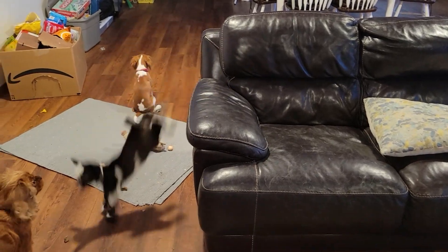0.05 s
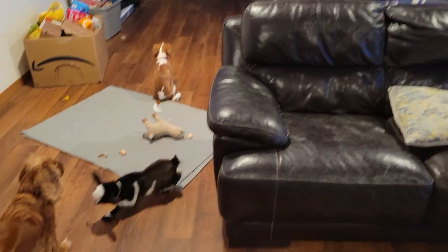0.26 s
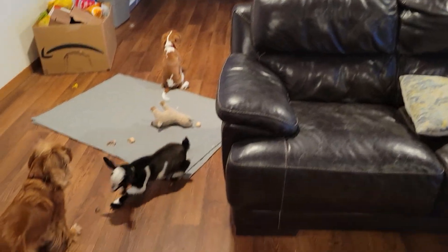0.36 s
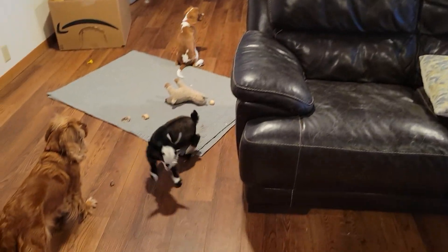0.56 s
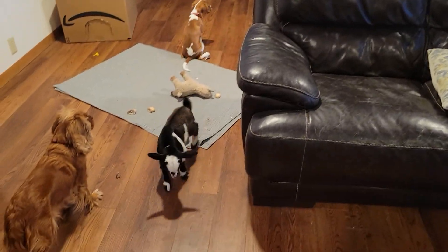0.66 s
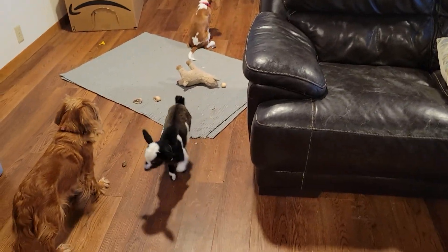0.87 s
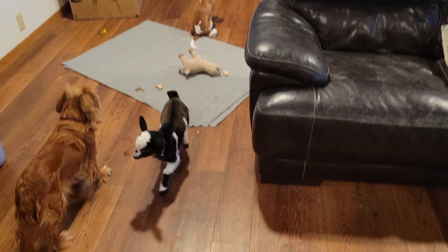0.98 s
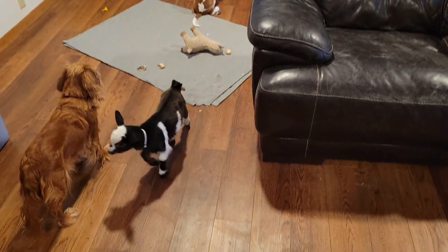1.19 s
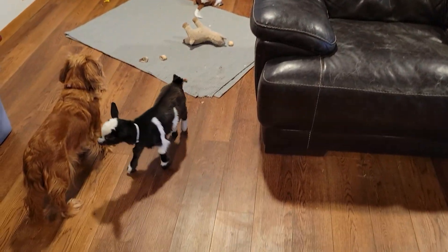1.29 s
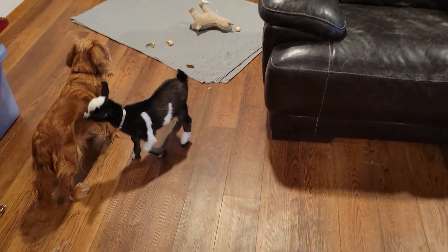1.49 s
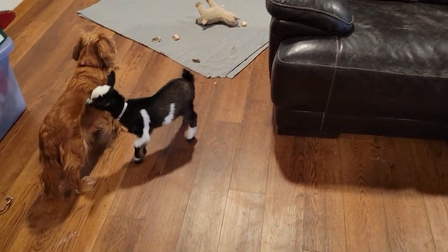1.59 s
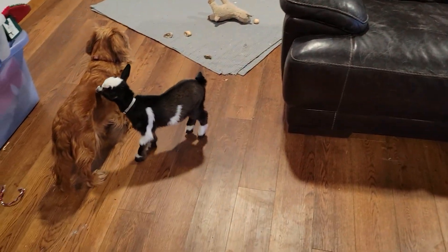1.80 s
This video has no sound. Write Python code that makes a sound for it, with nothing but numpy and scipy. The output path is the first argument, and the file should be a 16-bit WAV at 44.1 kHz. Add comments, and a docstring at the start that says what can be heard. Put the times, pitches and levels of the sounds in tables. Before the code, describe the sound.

A small goat's hooves land sharply on a wooden floor, followed by faint taps.

```python
"""In an echoing living room, a kid goat jumps off a couch onto a wooden floor.
Front hooves land, then hind hooves, with a skid and a clatter; it walks on with faint taps and scuffs.
Each hoof clicks, knocks the wood, rings the boards and thuds the floor; sliding hooves scrape.
The room answers over a low rumble, a weak hum and a faint hiss, all heard by a phone held above."""
import sys
import numpy as np
from scipy import signal
from scipy.fft import rfft, irfft
from scipy.io import wavfile

SR = 44100
rng = np.random.default_rng(int(sys.argv[2]) if len(sys.argv) > 2 else 0)


def transcribe(u):
    """Save the signal u as a 16-bit wav file named by the first command-line argument.

    u: samples, shape (n,) or (channels, n), limited to [-1, 1]; the rate is SR.
    q: integer samples, one column per channel.
    """
    v = np.clip(np.atleast_2d(u).T, -1, 1)
    q = np.round(v * 32767).astype(np.int16)
    wavfile.write(sys.argv[1], SR, q)


N = 81585

# Hooves striking: the first row is the goat pushing off the couch, the rest hit the floor. Each row: start in
# seconds, knock level in dB, knock pitch in Hz, knock fade time in seconds, click level in dB, bright tick
# level in dB, thud level in dB, left minus right in dB. A fade time (t60) is how long a sound takes to drop by
# 60 dB.
HOOF_STRIKES = [ (0.032, -64, 735, 0.054, -77, -59, -42.5, 0.5),
                (0.2006, -9.5, 880, 0.0031, -13.5, -35, -46, -1.5),
                (0.2077, -11.5, 1344, 0.0074, -41, -29.5, -44, -0.5),
                (0.2138, -29, 980, 0.005, -32, -34, -42, -12),
                (0.243, -32, 1370, 0.023, -30, -55, -39.5, -1),
                (0.2827, -27, 1160, 0.0027, -30, -31, -47, -16.5),
                (0.2847, -15, 1160, 0.0053, -14, -22, -31, -2),
                (0.2898, -15.5, 960, 0.0055, -24, -35, -51, 4.5),
                (.3010, -24, 769, 0.016, -59, -53, -44, -4), (.3078, -26.5, 916, 0.016, -69, -52, -73, 7.5),
                (.3210, -29, 1000, 0.033, -59, -55, -35, -3.5), (.3455, -24, 818, 0.027, -54, -50, -64, 4),
                (.3530, -27, 943, 0.0092, -48, -63, -39, -5), (0.3624, -29, 880, 0.0097, -43, -40, -53, -4),
                (0.631, -41.5, 880, 0.01, -72, -61, -74, 10), (.6450, -39, 830, 0.02, -62, -81, -60, 6),
                (0.7123, -35.5, 1337, 0.015, -44.5, -50.5, -64, 4),
                (0.7899, -48.5, 1210, 0.0063, -57, -57, -53, 5),
                (.9656, -40.5, 1240, 0.0075, -37.5, -42, -77, -6),
                (1.0560, -48.5, 1110, 0.023, -43, -46.5, -44.5, -6.5),
                (1.1501, -45.5, 1200, 0.015, -68, -65, -61, 10),
                (1.1560, -49, 1180, 0.017, -41, -48, -42.5, -6),
                (1.4388, -52, 900, 0.028, -59.5, -76, -66, 6),
                (1.4588, -54.5, 1280, 0.014, -52, -69, -72, 7),
                (1.5679, -61, 1017, 0.025, -60, -71, -54, -30),
                (1.5872, -46, 1285, 0.013, -45.5, -64, -46, 4.5),
                (1.7426, -48.5, 1070, 0.0088, -55.5, -73, -54, 1)]
# Hooves sliding. Each row: start in seconds, rise in seconds, seconds to fall to about a third,
# level in dB before SCUFF_DB is added, fine grit level in dB, left minus right in dB.
HOOF_SLIDES = [ (-.02, 0.027, 0.094, -62, -12, -4), (.199, 0.0066, 0.0037, -38, -6, 2),
               (0.223, 0.07, .01, -47.5, -2, -4), (.478, 0.023, 0.09, -60.5, -11, -2.5),
               (.605, .03, 0.012, -58, -9.5, -4), (.712, 0.0021, 0.021, -54, -12, -2),
               (0.754, .04, 0.048, -62.5, -16, -7), (.89, 0.052, 0.028, -62.5, -11, -1.5),
               (.966, 0.014, 0.025, -52, -11.5, 0.5), (1.015, 0.019, 0.012, -65.5, -5.5, -11),
               (1.44, 0.022, 0.025, -61.5, -14, -6.5), (1.585, 0.029, 0.046, -59.5, -14.5, -3)]
# The notes the boards ring at, and the low notes of the whole floor.
# Each row: pitch in Hz, relative level in dB, fade time in seconds.
BOARD_NOTES = [(686, -21, 0.34), (798, 7.5, 0.14), (946.6, 0, 0.38), (1059, -2, 0.36), (1078, -9, 0.39),
               (1176, 2, 0.12), (1281, -18, 0.053), (1340, -8.5, 0.24), (1590, -10.5, 0.053),
               (2730, 6.5, 0.056), (2564, -32, 0.049)]
FLOOR_NOTES = [(166, -6.5, 0.024), (242, -8, 0.072), (339.6, -0.5, 0.042), (386.8, -4.5, 0.082)]
# The tone of a hoof's click, its brighter tick, its scrape, the fine grit and the still room's hiss.
# Each row: frequency in Hz, relative level in dB.
CLICK_TONE = [(100, -50), (330, -15), (520, -4.5), (750, 1), (1500, -0.5), (2000, 3.5), (2800, 0),
              (3500, -2), (4200, -8), (5000, -13), (7500, -17.5), (10000, -24), (16000, -27.5)]
TICK_TONE = [(100, -35), (1000, 10), (4000, -1.5), (7000, 2.5), (10500, -6), (14000, -10), (16000, -10)]
SCRAPE_TONE = [(80, -15), (250, -40), (600, 5.5), (1300, 10), (2000, 5), (3200, 0.5), (5000, -2), (7700, 0),
               (9500, -14), (16000, -47)]
GRIT_TONE = [(2000, -29), (7000, 8), (10500, -6.5), (13500, -5), (16000, -8)]
HISS_TONE = [(20, -11), (32, 4), (48, 4.5), (75, -3), (105, -3.5), (180, -10.5), (360, -10.5), (550, -16.5),
             (1200, -22), (2200, -27.5), (4500, -34.5), (7700, -38.5), (9800, -48.5), (15500, -48)]
# How wide the hiss is. Each row: frequency in Hz, left-right difference against the shared part in dB.
HISS_WIDTH = [(30, -12), (90, -6.5), (250, -8), (600, 3), (15000, -1.5)]
# Household machines humming. Each row: pitch in Hz, level in dB.
HUM_NOTES = [(183, -72.5), (349, -74)]
# The room's lingering sound, or reverb. Each row: frequency in Hz, level in dB, fade time in seconds.
# Where the fade time falls below zero, that band is just one sharp snap.
ROOM_REVERB = [(102, -14, 1), (298, 2, 0.81), (774, 3, 0.54), (1300, -4.5, 0.8), (2800, 2.5, 0.47),
               (6530, 2.5, 0.77), (9300, 15, -0.54), (15000, 9, 0.5)]
# The first two echoes. Each row: left delay in seconds, right delay in seconds.
FIRST_ECHOES = [(.0061, .0064), (.0112, .0094)]

HISS_DB, RUMBLE_DB, RUMBLE_HZ, RUMBLE_SPREAD_HZ = -58, -56.5, 74.6, 14.4
ECHO_DB, ECHO_DULL_ABOVE_HZ = [-12.5, -10], 2500
REVERB_DELAY_S, REVERB_BUILD_S = .003, 0.0014
RIGHT_MIC_LAG_S, ALIKE_BELOW_HZ = .00028, 204  # both microphones hear the same bass
LANDING_DIRECT_DB, WALK_DIRECT_DB, SCUFF_DIRECT_DB = 2, 0.5, -1.5  # direct sound against the reverb
SCUFF_DB, GRAINS_PER_S = -3.5, 5000
CRUNCH_S, CRUNCH_DB = 0.0012, -3
BOARDS_DB, WOOD_LOW_HZ, WOOD_HIGH_HZ = -33, 555, 2600
THUD_REACH_HZ, THUD_HARDENING = 2660, 0.55
WALK_FROM_S = .55
TAIL = int(.8 * SR)  # samples given to each sound to die away


def undb(db):
    """Turn decibels into a gain."""
    return 10 ** (np.asarray(db) / 20)


def unit(x):
    """Scale to an average (rms) level of 1."""
    return x / np.sqrt(np.mean(x ** 2))


def lookup(table, hz, column=1):
    """Read between a table's rows on a log-frequency scale."""
    table = np.array(table, float)
    return np.interp(np.log(np.maximum(hz, 1)), np.log(table[:, 0]), table[:, column])


def freqs():
    """The frequencies in Hz that shape() works on."""
    return np.arange(N + 1) * SR / (2 * N)


def shape(x, gain):
    """Filter by a gain for each frequency."""
    return irfft(rfft(x, 2 * N) * gain)[..., :N]


def colour(x, table):
    """Give a sound the tone in a table, with a filter that never rings ahead of the sound."""
    gain = undb(lookup(table, freqs()))
    cepstrum = irfft(np.log(unit(gain)))
    cepstrum[1:N] *= 2
    cepstrum[N + 1:] = 0
    return shape(x, np.exp(rfft(cepstrum)))


def pulse(table):
    """One short click with the tone in a table."""
    return colour(signal.unit_impulse(N), table)[:1024]


def fade(t60):
    """A level that drops 60 dB every t60 seconds."""
    return np.exp(-np.log(1000) * np.arange(TAIL) / SR / max(t60, 1e-4))


def ring(hz, t60):
    """One fading note."""
    return np.sin(2 * np.pi * hz * np.arange(TAIL) / SR) * fade(t60)


def add(out, start_s, x):
    """Mix a stereo sound in at its start time."""
    i = int(start_s * SR)
    x, i = x[:, max(-i, 0):], max(i, 0)
    out[:, i:i + x.shape[1]] += x[:, :N - i]


def background():
    """Faint hiss, a low throbbing rumble and a weak hum of household machines."""
    mid, side, low = rng.standard_normal((3, N))
    side = shape(side, undb(lookup(HISS_WIDTH, freqs())))
    hiss = colour(np.array([mid + side, mid - side]), HISS_TONE)
    rumble = shape(low, 1 / (1 + ((freqs() - RUMBLE_HZ) / RUMBLE_SPREAD_HZ) ** 4))
    t = np.arange(N) / SR
    hum = sum(undb(db) * np.sqrt(2) * np.sin(2 * np.pi * hz * t) for hz, db in HUM_NOTES)
    return undb(HISS_DB) * unit(hiss) + undb(RUMBLE_DB) * unit(rumble) + hum


def arrival(left_s, right_s):
    """One sound path, reaching each microphone after its own delay."""
    return np.array([signal.unit_impulse(TAIL, int(s * SR)) for s in (left_s, right_s)])


def living_room():
    """Return play(): a sound arrives directly, as two echoes and with a fresh reverb for each spot."""
    centres = np.geomspace(70, 18000, 13)  # Hz
    t = np.arange(TAIL) / SR
    noise = rfft(rng.standard_normal(N), 2 * N)
    build = 1 - np.exp(-np.maximum(t - REVERB_DELAY_S, 0) / REVERB_BUILD_S)
    bands = []
    for hz, this_band in zip(centres, np.eye(len(centres))):
        band = irfft(noise * lookup(np.c_[centres, this_band], freqs()))
        level = fade(lookup(ROOM_REVERB, hz, column=2)) * build
        level = level / np.linalg.norm(level) * undb(lookup(ROOM_REVERB, hz))
        width = .5 / (1 + (ALIKE_BELOW_HZ / hz) ** 2)
        bands.append((band, level, width))
    direct = arrival(0, RIGHT_MIC_LAG_S)
    echoes = sum(undb(db) * arrival(*delays) for delays, db in zip(FIRST_ECHOES, ECHO_DB))
    echoes = signal.sosfilt(signal.butter(1, ECHO_DULL_ABOVE_HZ, fs=SR, output="sos"), echoes + 1e-18)

    def play(x, pan_db, direct_db):
        i, j = rng.integers(0, N - TAIL, size=2)
        mid = sum(band[i:i + TAIL] * level * np.sqrt(1 - width) for band, level, width in bands)
        side = sum(band[j:j + TAIL] * level * np.sqrt(width) for band, level, width in bands)
        response = undb(direct_db) * (direct + echoes) + np.array([mid + side, mid - side])
        return signal.fftconvolve(x[None], response, axes=1) * undb([[pan_db / 2], [-pan_db / 2]])
    return play


def scuffs(play):
    """A sliding hoof catches on the floor in a stream of tiny clicks."""
    out, t = np.zeros((2, N)), np.arange(TAIL) / SR
    scrape, grit = pulse(SCRAPE_TONE), pulse(GRIT_TONE)
    for start, rise, fall, db, grit_db, pan_db in HOOF_SLIDES:
        catches = rng.random(TAIL) < GRAINS_PER_S / SR
        grains = unit(catches * rng.standard_normal(TAIL))
        push = np.clip(t / rise, 0, 1) ** 0.5 * np.exp(-np.maximum(t - rise, 0) / fall)
        slide = signal.fftconvolve(undb(db + SCUFF_DB) * grains * push, scrape + undb(grit_db) * grit)
        add(out, start, play(slide, pan_db, SCUFF_DIRECT_DB))
    return out


def floor_thud(db):
    """The whole floor thuds. A harder blow is shorter, so it reaches higher notes."""
    bass_cut = signal.butter(2, 140, "high", fs=SR, output="sos")
    reach_hz = THUD_REACH_HZ * undb(db) ** THUD_HARDENING
    notes = sum(undb(note_db) * ring(hz, t60) / np.hypot(1, (hz / reach_hz) ** 2)
                for hz, note_db, t60 in FLOOR_NOTES)
    return undb(db) * signal.sosfilt(bass_cut, notes + 1e-18)


def wood_knock(hz, t60, boards):
    """The struck spot knocks and the boards ring along, with the lows and highs softened."""
    low_cut = signal.butter(3, WOOD_LOW_HZ, "high", fs=SR, output="sos")
    high_cut = signal.butter(1, WOOD_HIGH_HZ, fs=SR, output="sos")
    return signal.sosfilt(np.vstack([low_cut, high_cut]), ring(hz, t60) + boards + 1e-18)


def hoof_click(click, tick):
    """The hard horn of a hoof clicks and ticks, each with a short crunch."""
    t = np.arange(SR // 50) / SR
    crunch = rng.standard_normal((2, len(t))) * np.exp(-t / CRUNCH_S)
    crunch *= undb(CRUNCH_DB) / np.linalg.norm(crunch, axis=1, keepdims=True)
    crunch[:, 0] += 1  # the sharp first touch
    horn = 2 * (np.convolve(crunch[1], tick) - np.convolve(crunch[0], click))
    return np.pad(horn, (0, TAIL - len(horn)))


def hooves(play):
    """The goat lands and walks on: each strike is a click, a knock and a thud together."""
    out = np.zeros((2, N))
    boards = undb(BOARDS_DB) * sum(undb(db) * ring(hz, t60) for hz, db, t60 in BOARD_NOTES)
    click, tick = pulse(CLICK_TONE), pulse(TICK_TONE)
    for start, knock_db, hz, t60, click_db, tick_db, thud_db, pan_db in HOOF_STRIKES:
        horn = hoof_click(undb(click_db) * click, undb(tick_db) * tick)
        wood = undb(knock_db) * wood_knock(hz, t60, boards)
        direct_db = LANDING_DIRECT_DB if start < WALK_FROM_S else WALK_DIRECT_DB
        add(out, start, play(horn + wood + floor_thud(thud_db), pan_db, direct_db))
    return out


def scene():
    """Hoof strikes and scuffs in the room, over its background."""
    still_room, play = background(), living_room()
    return still_room + hooves(play) + scuffs(play)


def record(dry):
    """The phone cuts off the very highest sounds."""
    top_hz = 15850
    return signal.sosfilt(signal.ellip(10, .2, 70, top_hz, fs=SR, output="sos"), dry)


dry = scene()
out = record(dry)
transcribe(out)
```